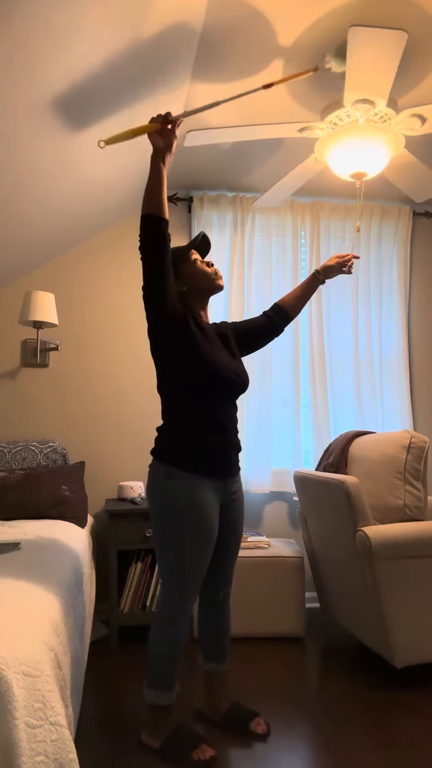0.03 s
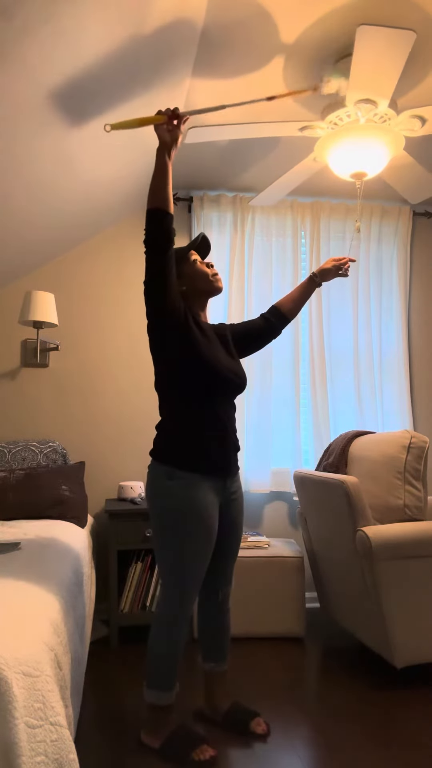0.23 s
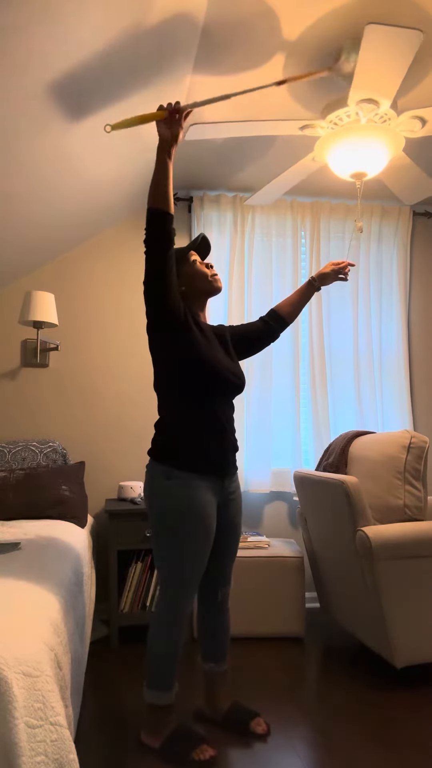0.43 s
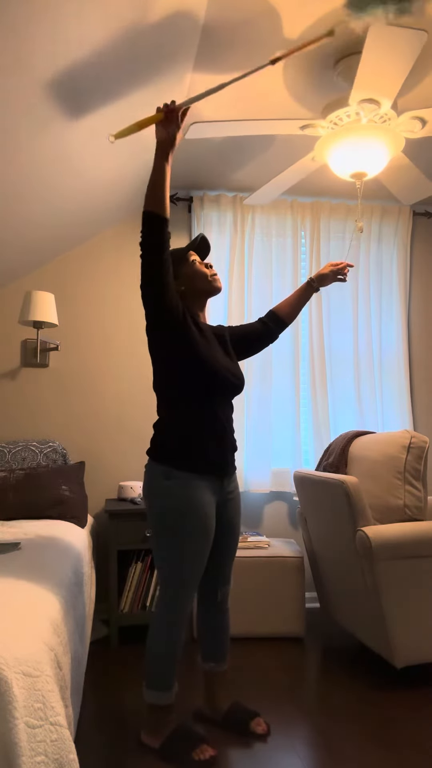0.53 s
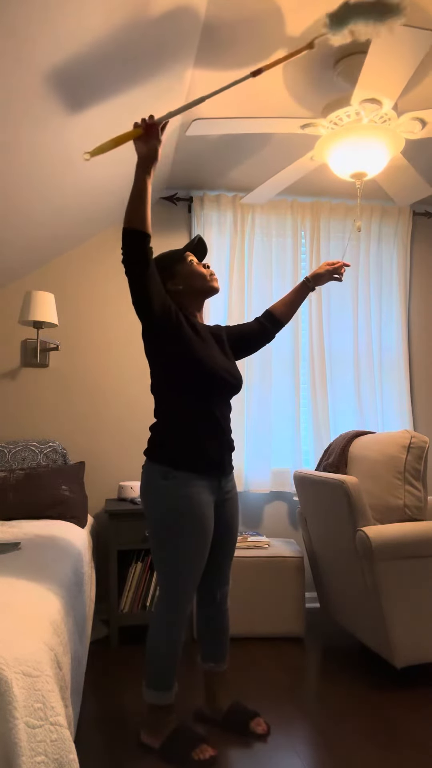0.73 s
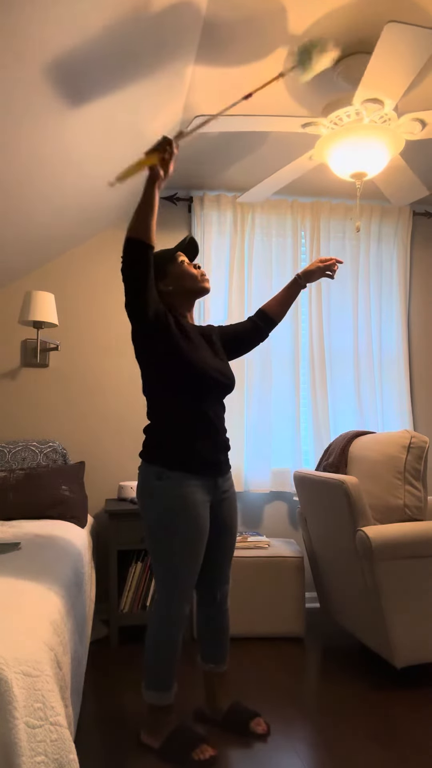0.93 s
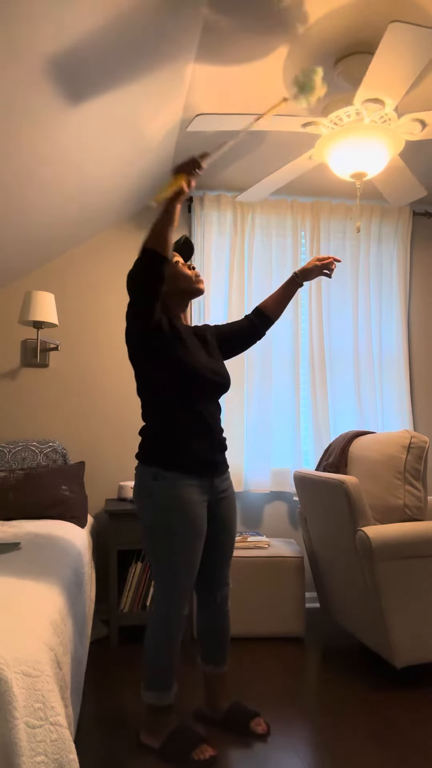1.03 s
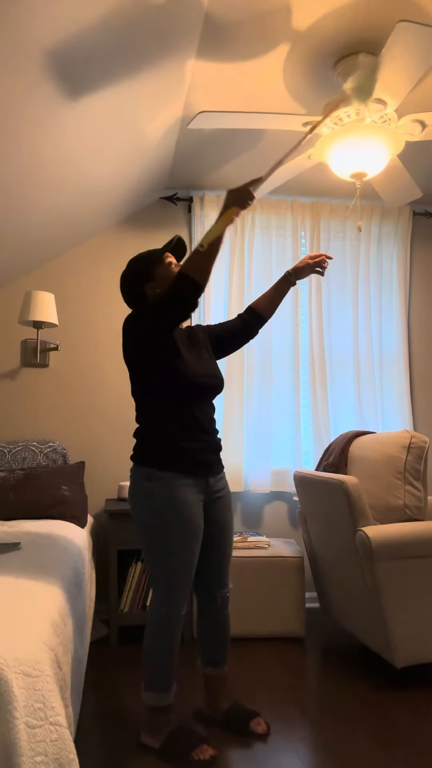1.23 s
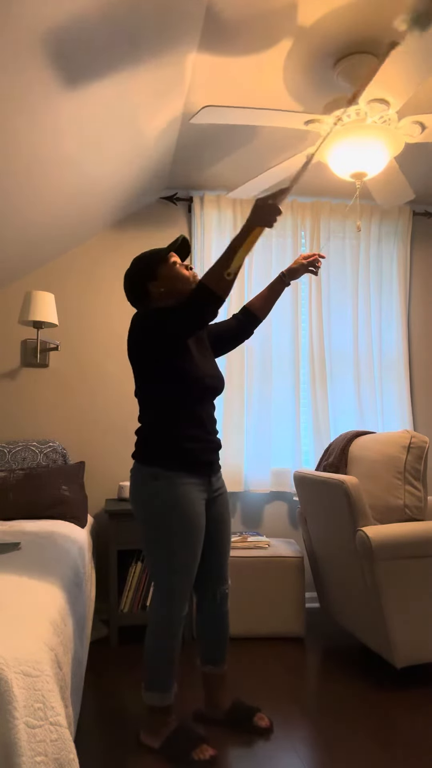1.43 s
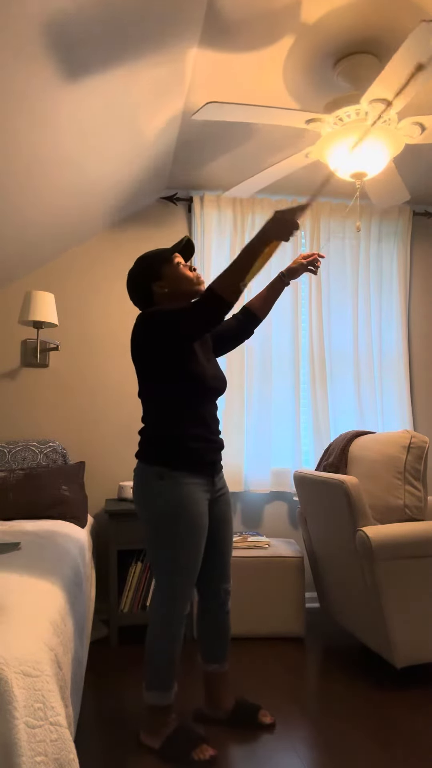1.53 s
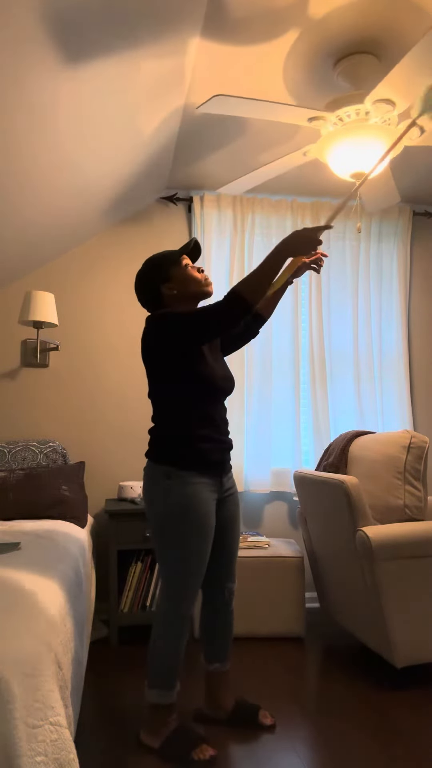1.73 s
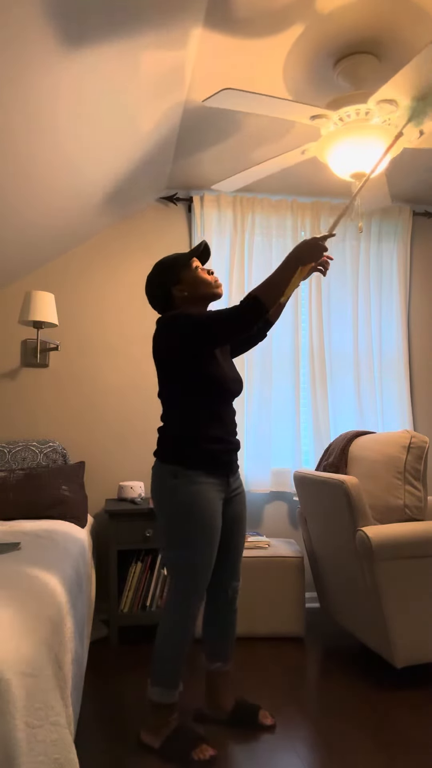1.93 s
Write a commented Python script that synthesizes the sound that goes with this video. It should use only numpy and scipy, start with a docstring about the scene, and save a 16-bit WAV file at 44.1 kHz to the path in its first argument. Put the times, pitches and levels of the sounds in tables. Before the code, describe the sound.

Hollow clacks of a duster pole on a still ceiling fan blade, two rattling knocks early, small ticks, then faint brushing and one more solid knock, over low airflow hum in a small furnished room, phone a few metres away.

```python
"""Knocks and rattles of a long hollow duster pole on the blades of a still ceiling fan, with brushing between.
Knock: hollow pop, noise crack, ringing pole modes. Rattle: dense random contacts. Tick: bright snap and short ring.
Thump: blade modes. Brushing: dense grains of noise in three strokes, from the head dragged along a blade.
A small furnished room answers with sparse-tap tails; shaped noise gives steady airflow hum and low rumble.
Heard by a phone a few metres off, through two microphone ports."""
import sys
import numpy as np
from scipy import signal
from scipy.fft import rfft, irfft
from scipy.io import wavfile
from scipy.ndimage import uniform_filter1d

SR = 44100
rng = np.random.default_rng(int(sys.argv[2]) if len(sys.argv) > 2 else 0)


def boost(x):
    """Linear amplitude factor 10**(x/20) for a level x in decibels (scalar or array-like)."""
    u = np.asarray(x, float) / 20
    return 10 ** u


def store_pcm(level_fs):
    """Save levels as 16-bit WAV."""
    pcm = np.round(np.clip(level_fs, -1, 1) * 32767).astype(np.int16)
    wavfile.write(sys.argv[1], SR, np.atleast_2d(pcm).T)


N = 88200


def evened(x):
    """Scales x to unit rms."""
    return x / np.sqrt(np.mean(x ** 2) + 1e-20)


def read(points, hz):
    """Interpolates a (frequency, value) table over log frequency."""
    f, value = np.transpose(points)
    return np.interp(np.log(hz + 1), np.log(f + 1), value)


def add(mix, start_s, sound):
    """Adds sound into mix in place, cut at the end of mix."""
    part = mix[round(start_s * SR):][:len(sound)]
    part += sound[:len(part)]


def coloured(x, points, tilt_db_per_oct=0):
    """Filters x by a spectrum table and a tilt around 2 kHz."""
    hz = np.fft.rfftfreq(len(x), 1 / SR)
    gain_db = read(points, hz) + tilt_db_per_oct * np.log2((hz + 50) / 2000)
    return irfft(rfft(x) * boost(gain_db), len(x))


def ring(modes, tilt_db_per_oct):
    """One strike of a mode table: decaying sines at random phase, each mode caught a little differently."""
    scatter_db, onset_s = 3, 0.002
    t = np.arange(SR // 2) / SR
    hz, db, t60_s = np.transpose(modes)[:, :, None]
    luck = rng.standard_normal((len(modes), 1))
    phase = 2 * np.pi * rng.random((len(modes), 1))
    level_db = db + tilt_db_per_oct * np.log2(hz / 2000) + scatter_db * luck
    partials = boost(level_db - 60 * t / t60_s) * np.sin(2 * np.pi * hz * t + phase)
    return partials.sum(0) * np.minimum(t / onset_s, 1)


# broadband airflow spectrum: (frequency [Hz], relative density [dB])
AIR_SPECTRUM = [(20, -35), (50, -1), (120, -5.5), (200, -17.5), (300, -13.5), (470, -5.5), (560, -1),
                (700, -10), (950, -18.5), (1300, -27), (1900, -22.5), (2500, -33.5), (4000, -44),
                (6500, -48.5), (9000, -56), (13000, -60), (15000, -62)]
# fuzzy hums: (frequency [Hz], 1/e half-width [Hz], level [dB])
AIR_HUMS = [(59, 4.7, -65.5), (108, 4, -65.5), (278.6, 5.6, -70), (483.6, 9.3, -59.5), (565.7, 20, -58),
            (631, 22, -60)]


def air():
    """Patchy airflow noise with fuzzy hums, arriving from two unrelated directions."""
    broadband_db, patch_db = -52.5, 1.42
    frames, hz = N // 1024 + 5, np.fft.rfftfreq(4096, 1 / SR)
    a, b, c, d, patches = rng.standard_normal((frames, 2049, 5)).T
    patches = uniform_filter1d(patches, 20, 0)
    patches = evened(uniform_filter1d(patches, 4, 1))
    density = boost(read(AIR_SPECTRUM, hz)) ** 2
    power = boost(broadband_db) ** 2 * density / np.sum(density)
    for hum_hz, width_hz, db in AIR_HUMS:
        bump = np.exp(-((hz - hum_hz) / width_hz) ** 2)
        power = power + boost(db) ** 2 * bump / bump.sum()
    z = np.array([a + 1j * b, c + 1j * d])
    z *= np.sqrt(power)[:, None] * boost(patch_db * patches)
    noise = signal.istft(z, nperseg=4096, noverlap=3072)[1][:, 2048:N + 2048]
    return np.sqrt(power.sum()) * evened(noise)


# reverberation time: (frequency [Hz], t60 [s])
ROOM_T60 = [(200, 1), (1000, 0.64), (2000, 0.23), (5000, 0.3), (12000, 0.3)]


def room(x):
    """Two tails of sparse taps of random sign, each band dying at its own speed."""
    first_s, slot = 0.008, 20  # slot: samples per tap
    taps = np.zeros((2, SR // 2))
    slots = np.arange(round(first_s * SR), SR // 2 - slot, slot)
    at = slots + rng.integers(0, slot, (2, SR // 40))[:, :len(slots)]
    signs = rng.choice([-1., 1.], (2, SR // 40))[:, :len(slots)]
    np.put_along_axis(taps, at, signs, 1)
    hz, t, z = signal.stft(taps, SR, nperseg=256)
    decay = boost(-60 * t / read(ROOM_T60, hz)[:, None])
    tail = signal.istft(z * decay, SR, nperseg=256)[1]
    return signal.fftconvolve(x[None], tail / np.linalg.norm(tail[0]), axes=1)[:, :N]


def scattered(x):
    """Nearby surfaces smear x over a few ms: bass a quarter cycle late, higher bands turned further at random."""
    hz = np.fft.rfftfreq(N, 1 / SR)
    steps = rng.uniform(-np.pi, 0, 200) * (np.arange(200) > 21)
    turn = np.interp(hz, np.arange(200) * 120, np.cumsum(steps)) - np.pi / 2
    return irfft(rfft(x) * np.exp(1j * turn), N)


# blade flexes: (start [s], level [dB])
BLADE_THUMPS = [(0.728, -50), (1.58, -42)]
# blade modes: (frequency [Hz], level [dB], t60 [s])
BLADE_MODES = [(106, -9, 0.17), (141, -9, 0.29), (204, 2.5, 0.13), (279, -4.5, 0.043)]


def thump(start_s, db):
    """The blade flexes and rings at its low modes."""
    return start_s, boost(db) * ring(BLADE_MODES, 0)


# list of strokes, each of points: (time [s], level [dB], treble [dB], hollow tone [dB])
BRUSH_STROKES = [
    [(.26, -53.5, -5.5, 8), (.31, -61.5, -2.5, 3.5), (.335, -56, -1, 2.5), (.37, -62, 1.5, 1.5),
     (.425, -59.5, 5.5, 7)],
    [(1.12, -79, 13.5, 2), (1.16, -80, 10, 7), (1.185, -62.5, 1.5, 0.5), (1.235, -65.5, -2.5, -9),
     (1.27, -60, 0.5, -9), (1.34, -68.5, 2.5, 5), (1.385, -66.5, 0, 10), (1.43, -67, -11, 0),
     (1.5, -65, -5.5, 6.5), (1.56, -80, -13, 14)],
    [(1.585, -68.5, 11, -6), (1.625, -68.5, 11.5, 16), (1.7, -85, -13, 7), (1.8, -87, 6, 4),
     (1.825, -74.5, 6, 4), (1.856, -100, -1.5, -1), (1.896, -72.5, 1, -13), (1.95, -94.5, 17.5, -4),
     (2.02, -71.5, 6.5, 1)],
]
# fibre scratch spectrum: (frequency [Hz], relative density [dB])
FIBRE_SPECTRUM = [(900, -39), (1500, -5), (2100, 3), (3400, -3), (4500, -6.5), (5600, -2.5), (6600, -12.5),
                  (9000, -10.5), (12000, -16.5), (15000, -18.5)]


def brush():
    """Fibres drag over the blade: dense tiny scratches; the stroke sets treble and the pole's hollow tone."""
    fibres_per_s, edge_s = 21000, 0.0043
    t, out = np.arange(N) / SR, np.zeros(N)
    sizes = boost(1.2 * rng.exponential(1, N)) * rng.standard_normal(N)
    grains = sizes * (rng.random(N) < fibres_per_s / SR)
    plain = evened(coloured(grains, FIBRE_SPECTRUM))
    hollow = signal.sosfiltfilt(signal.butter(2, 3200, fs=SR, output="sos"), plain)
    dull = signal.sosfiltfilt(signal.butter(2, 6800, fs=SR, output="sos"), plain)
    for stroke in BRUSH_STROKES:
        s, db, treble_db, hollow_db = np.transpose(stroke)
        edge = np.clip(np.minimum(t - s[0], s[-1] - t) / edge_s, 0, 1)
        low = boost(np.interp(t, s, hollow_db)) * hollow
        high = boost(np.interp(t, s, treble_db)) * (plain - dull)
        out += edge * boost(np.interp(t, s, db)) * (low + dull - hollow + high)
    return out


# pole joint ticks: (start [s], level [dB], ring frequency [Hz], tilt [dB/octave], ring level re tick [dB])
JOINT_TICKS = [(.6078, -37, 5810, 3, 0), (.7236, -29, 5720, -8.5, -3), (1.1056, -35, 3500, 5.5, -22),
               (1.108, -39, 2360, -1.5, 0)]
# tick noise spectrum: (frequency [Hz], relative density [dB])
SNAP_SPECTRUM = [(900, -40), (1800, -5), (2400, 7.5), (4000, 1.5), (5200, -20), (6500, -12), (9000, -0.5),
                 (12000, -22), (15500, -2.5)]
# pole modes, also rung by rattle and blow: (frequency [Hz], level [dB], t60 [s])
POLE_MODES = [(395, -13, .1), (549, -10, .12), (903, -11, .08), (1100, -8, .06), (1455, -9, .07),
              (1910, -1, .05), (2005, -2, .045), (2160, -3, .14), (2480, -6, .05), (2880, -5, .05),
              (3185, -2, .05), (3530, -6, .05), (3800, 0, .05), (4250, -16, .07), (4810, -9, .03),
              (5600, -8, .02)]


def tick(start_s, db, hz, tilt_db_per_oct, ring_db):
    """A wide snap with a few cycles of ring and a short airy scrape; the pole rings faintly."""
    snap_s, scrape_s, ring_s, pole_db = 0.0013, 0.036, 0.0005, -30
    t = np.arange(SR // 5) / SR
    noise = evened(coloured(rng.standard_normal(len(t)), SNAP_SPECTRUM, tilt_db_per_oct))
    snap = noise * (0.35 * np.exp(-t / snap_s) + boost(-21) * np.exp(-t / scrape_s))
    joint = boost(ring_db) * np.exp(-(t / ring_s - 2) ** 2) * np.sin(2 * np.pi * hz * t)
    pole = boost(pole_db) * ring(POLE_MODES, tilt_db_per_oct)[:len(t)]
    return start_s, boost(db) * (snap + joint + pole)


# loose chatter of pole sections: (start [s], Gaussian fade [s], level [dB], tilt [dB/octave])
POLE_RATTLES = [(.226, 0.023, -37, -3.5), (.417, 0.058, -31, 1.5), (.7205, 0.034, -47.5, -2.5),
                (1.568, 0.042, -49.5, -5.5)]
# contact noise spectrum, also used by blow: (frequency [Hz], relative density [dB])
CRACK_SPECTRUM = [(350, -71), (600, -16), (1050, -16.5), (1400, -15), (2000, -3), (3500, -4), (4450, -13),
                  (5600, -9.5), (8000, -22.5), (11000, -28), (15000, -41)]


def rattle(start_s, fade_s, db, tilt_db_per_oct):
    """A dense crunch of small contacts that fades, cracking and ringing the pole."""
    contacts_per_s, rise_s, flutter_db = 2500, 0.009, 0.58
    t = np.arange(SR // 4) / SR
    sizes = boost(1.1 * np.minimum(rng.exponential(1, len(t)), 3)) * rng.choice([-1, 1], len(t))
    taps = sizes * (rng.random(len(t)) < contacts_per_s / SR)
    flutter = evened(uniform_filter1d(rng.standard_normal(len(t)), size=130))
    shape = np.minimum(t / rise_s, 1) * np.exp(-(t / fade_s) ** 2) * boost(flutter_db * flutter)
    body = signal.fftconvolve(taps * shape, ring(POLE_MODES, tilt_db_per_oct))[:len(t)]
    snap = evened(coloured(taps, CRACK_SPECTRUM, tilt_db_per_oct)) * shape
    return start_s, boost(db) * (1.3 * evened(body) * np.std(snap) + snap)


# pole meets blade: (pop centre [s], level [dB], pop pitch [Hz], hardness [dB/octave])
POLE_BLOWS = [(.2285, -33, 2430, 8), (.2312, -29, 2235, 2.5), (.2342, -30.5, 2213, -10.5),
              (.2382, -34.5, 2066, -14.5), (.4225, -26.5, 1910, 6.5), (.4265, -28, 1900, 1),
              (.4302, -20.5, 1885, 2.5), (.4385, -16, 2020, 5.5), (.4437, -32, 1960, 1),
              (.451, -25, 2140, 19), (.4625, -25, 2140, -7.5), (.726, -28.5, 1986, -1.5),
              (1.5772, -19, 2017, -7.5), (1.587, -34, 1980, -17.5), (1.591, -33, 2150, -14)]


def blow(centre_s, db, hz, hard_db_per_oct):
    """A hollow pop that swells and dies in a few cycles, a crack, and the ringing pole."""
    pop_s, crack_s, crack_db, ring_db = 0.0016, 0.0053, -13.5, -39
    t = np.arange(SR // 2) / SR
    pop = np.exp(-((t - 2 * pop_s) / pop_s) ** 2) * np.sin(2 * np.pi * hz * t)
    noise = evened(coloured(rng.standard_normal(len(t)), CRACK_SPECTRUM, hard_db_per_oct))
    crack = noise * t / crack_s * np.exp(1 - 2 * t / crack_s)
    pole = ring(POLE_MODES, hard_db_per_oct)
    return centre_s - 2 * pop_s, boost(db) * (pop + boost(crack_db) * crack + boost(ring_db) * pole)


def scene():
    """Rows: the sound pressure at the phone and its gradient."""
    room_db = -12
    duster = brush()
    events = ((POLE_BLOWS, blow), (POLE_RATTLES, rattle), (JOINT_TICKS, tick), (BLADE_THUMPS, thump))
    for table, source in events:
        for row in table:
            add(duster, *source(*row))
    direct = np.array([duster, scattered(duster)])
    return direct + boost(room_db) * room(duster) + air()


def low_pass(x):
    """Removes everything above the highest recorded frequency."""
    return signal.sosfilt(signal.butter(12, 15630, fs=SR, output="sos"), x)


# two microphone ports: (frequency [Hz], gain of differing over shared part [dB])
PORT_DIFFERENCE = [(60, -43), (140, -12), (380, -19), (800, -4), (1900, -4.5), (2800, -1.5), (4300, -3),
                   (6300, 3), (6900, 7.5), (7200, 23.5), (8700, 15.5), (9100, 5.5), (10200, -3.5),
                   (10700, -24), (12800, -18), (13200, 3.5), (14200, -3.5), (14800, 33.5)]
# stereo lean: (frequency [Hz], left minus right [dB])
STEREO_LEAN = [(240, 0.5), (950, -2), (8000, 1.5)]


def record(dry):
    """The ports share or oppose each band; slight lean, band edge."""
    edge_hz, slope_hz = 15900, 300
    hz = np.fft.rfftfreq(N, 1 / SR)
    angle = np.arctan(boost(read(PORT_DIFFERENCE, hz)))
    band = np.clip((edge_hz - hz) / slope_hz, 0, 1)
    shared, differs = rfft(dry, axis=1) * [np.cos(angle), np.sin(angle)] * band
    lean = boost(read(STEREO_LEAN, hz) / 2 * np.array([[1], [-1]]))
    mix = irfft(lean * [shared + differs, shared - differs], N, axis=1)
    return low_pass(mix)


dry = scene()
out = record(dry)
store_pcm(out)
```